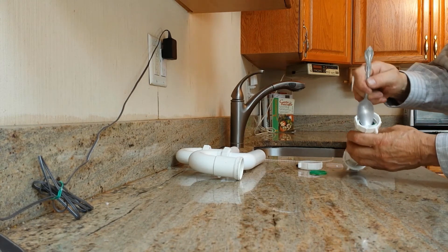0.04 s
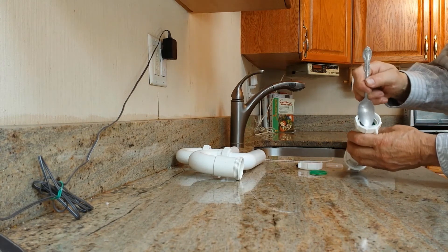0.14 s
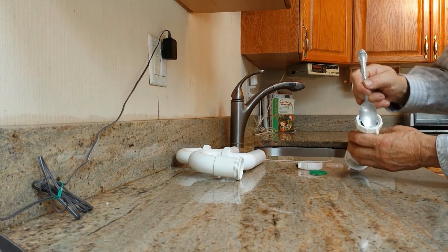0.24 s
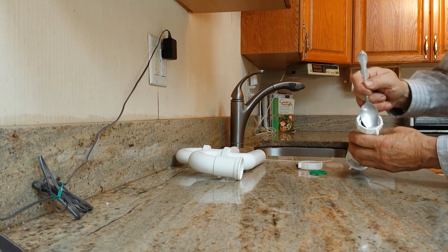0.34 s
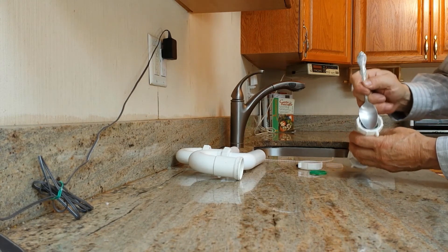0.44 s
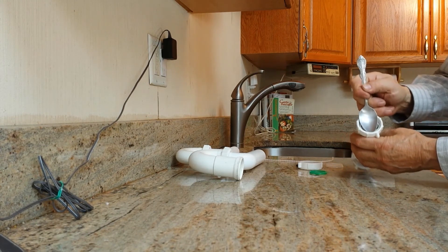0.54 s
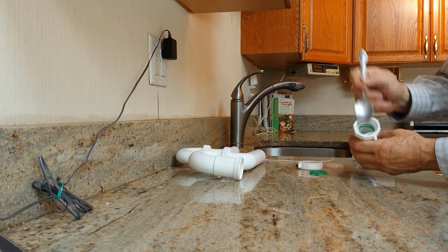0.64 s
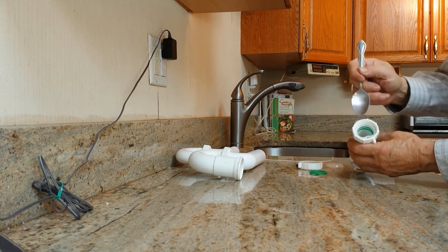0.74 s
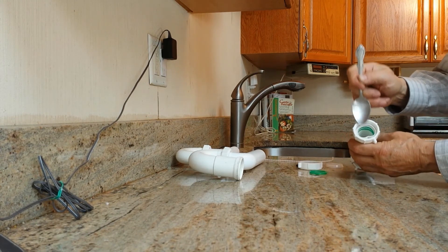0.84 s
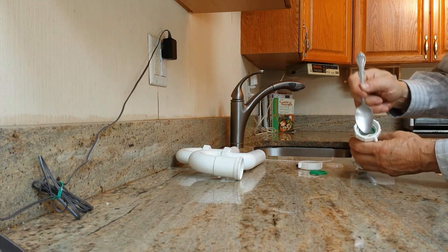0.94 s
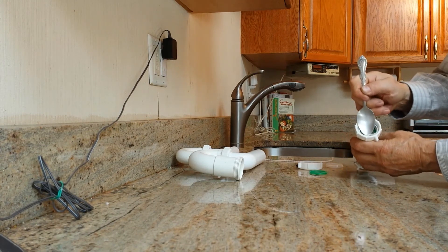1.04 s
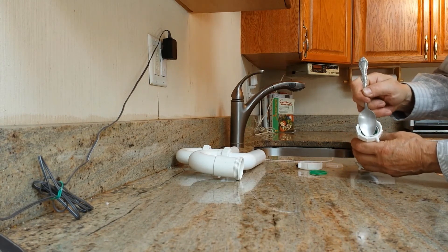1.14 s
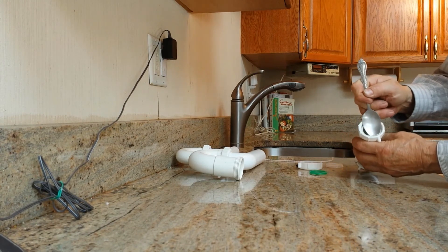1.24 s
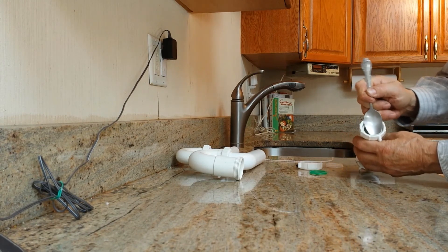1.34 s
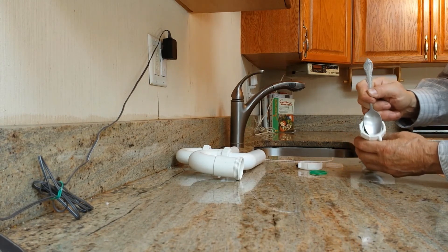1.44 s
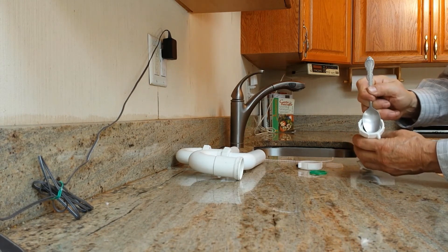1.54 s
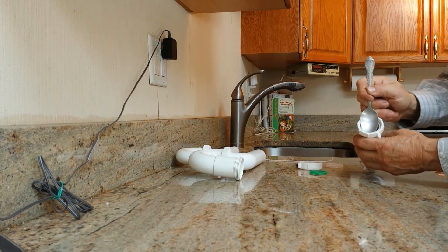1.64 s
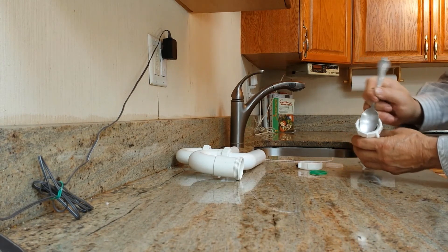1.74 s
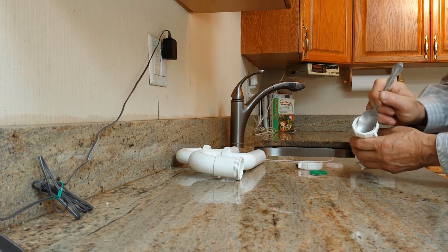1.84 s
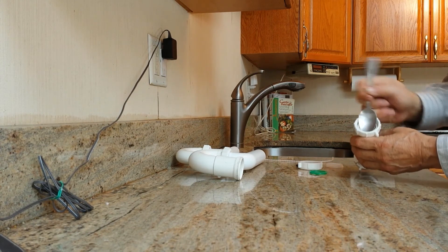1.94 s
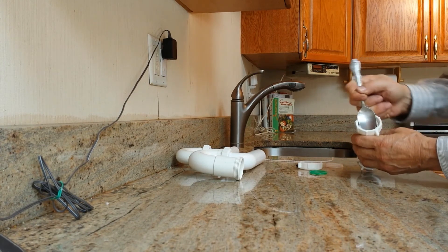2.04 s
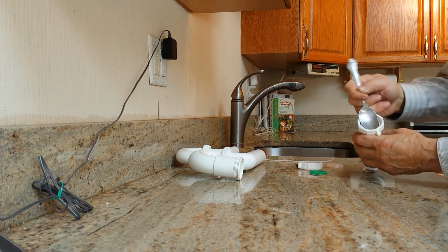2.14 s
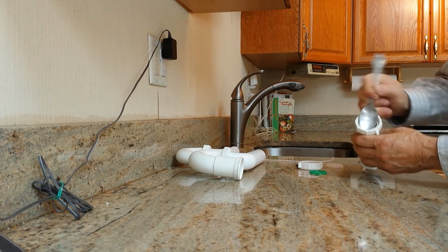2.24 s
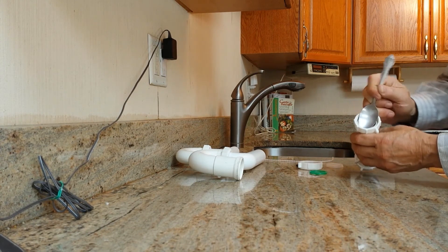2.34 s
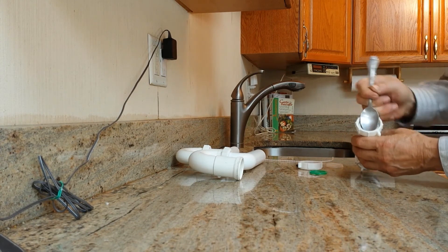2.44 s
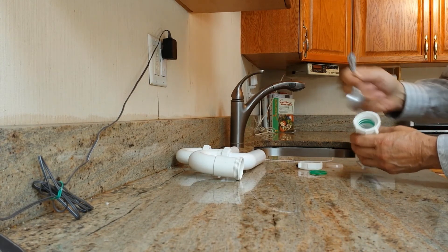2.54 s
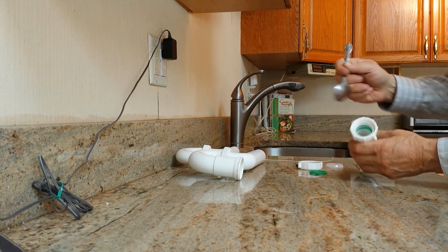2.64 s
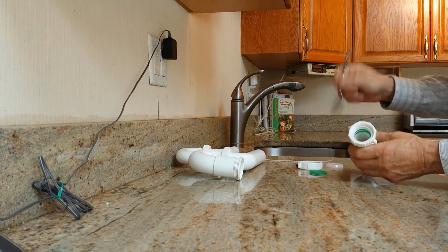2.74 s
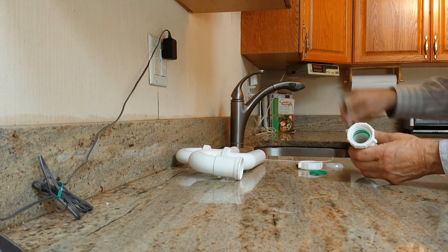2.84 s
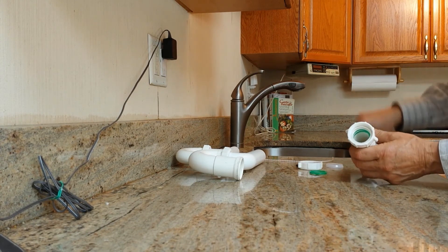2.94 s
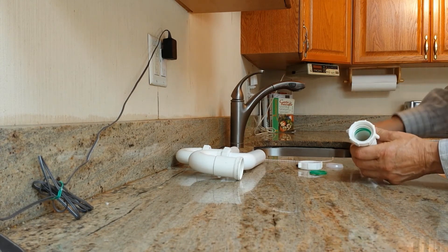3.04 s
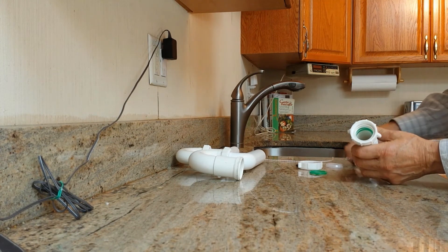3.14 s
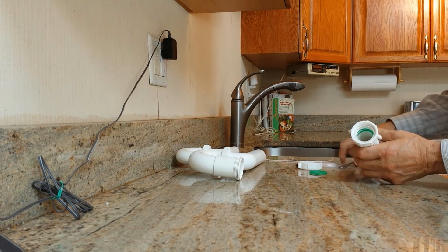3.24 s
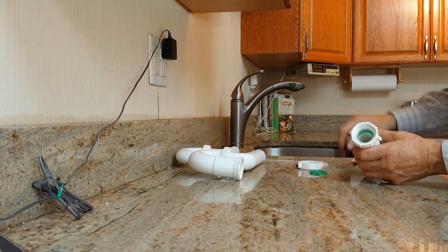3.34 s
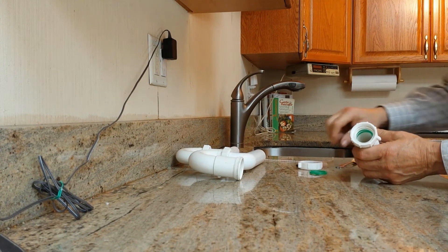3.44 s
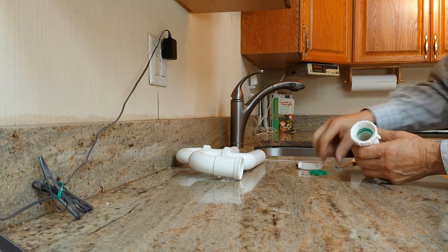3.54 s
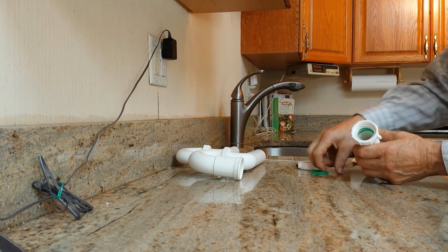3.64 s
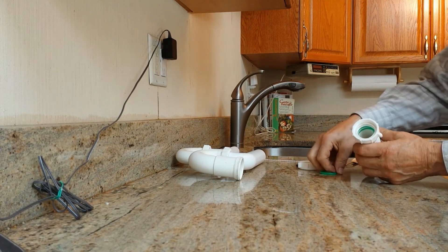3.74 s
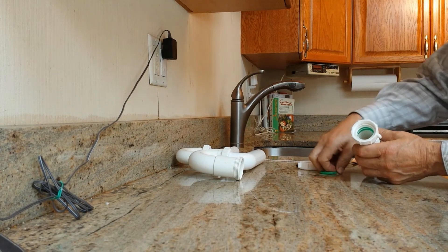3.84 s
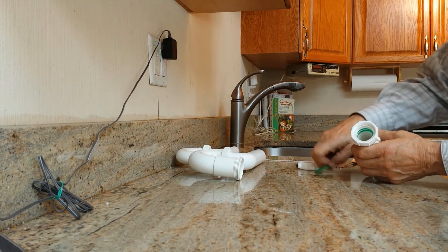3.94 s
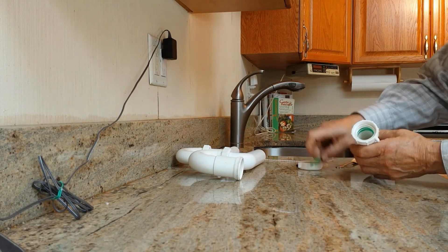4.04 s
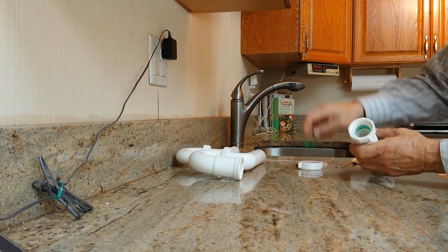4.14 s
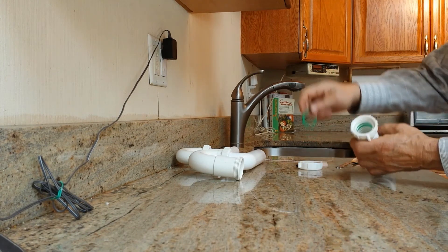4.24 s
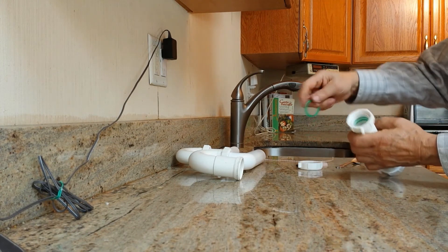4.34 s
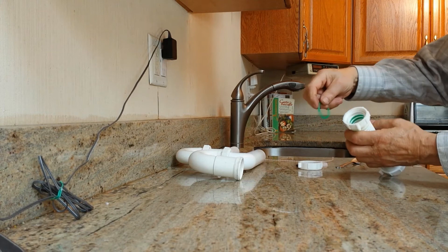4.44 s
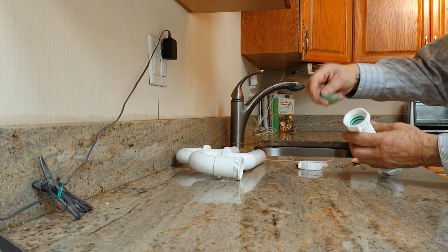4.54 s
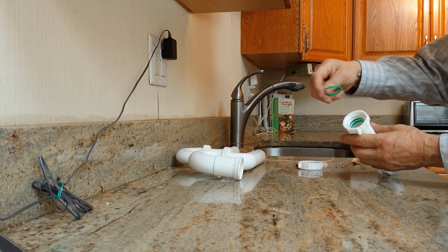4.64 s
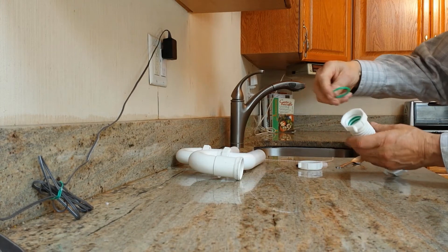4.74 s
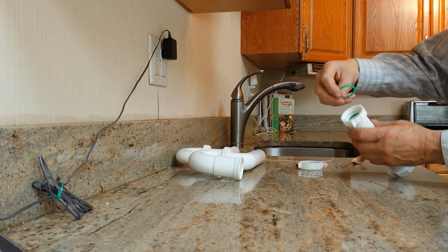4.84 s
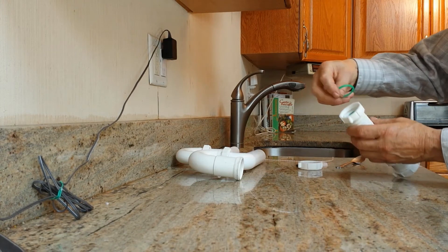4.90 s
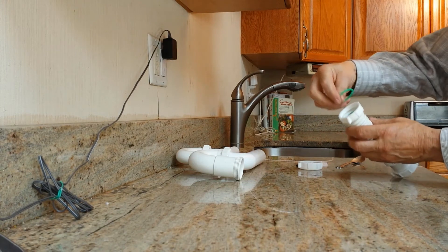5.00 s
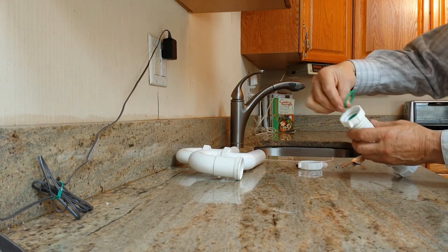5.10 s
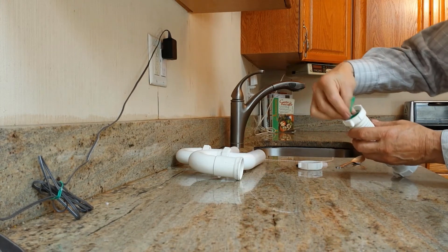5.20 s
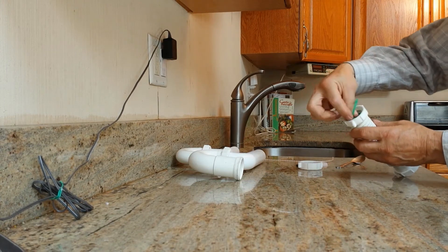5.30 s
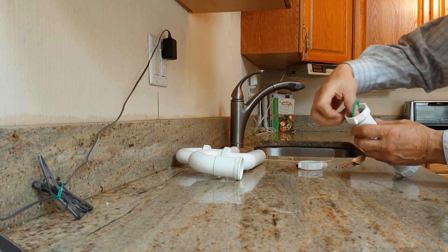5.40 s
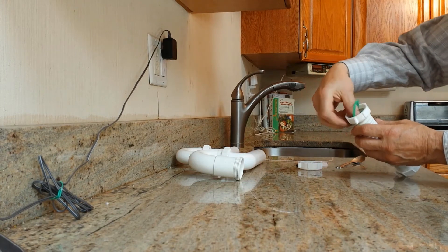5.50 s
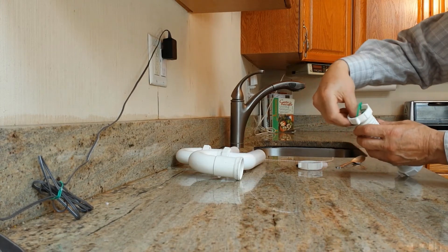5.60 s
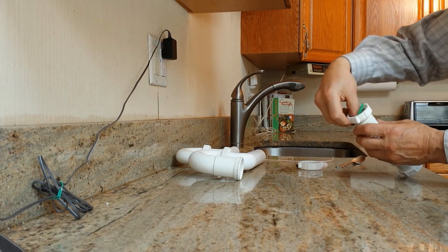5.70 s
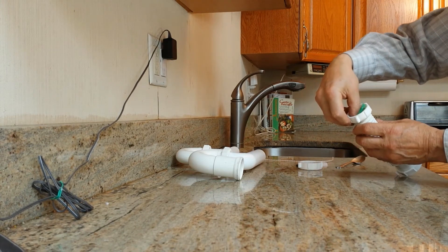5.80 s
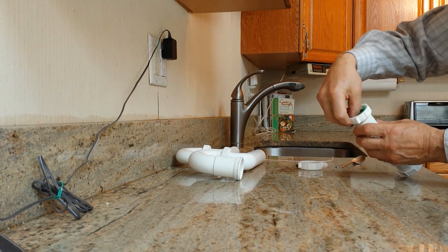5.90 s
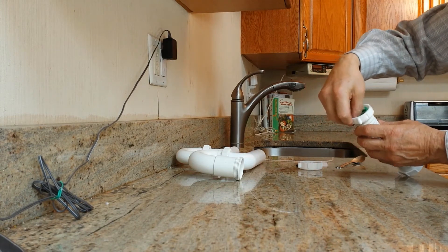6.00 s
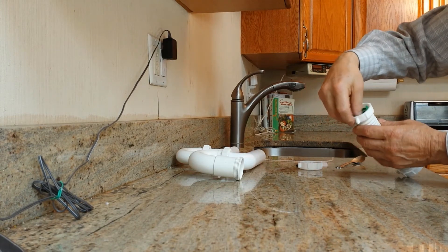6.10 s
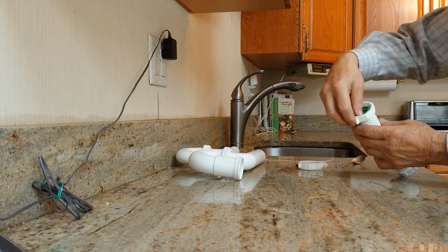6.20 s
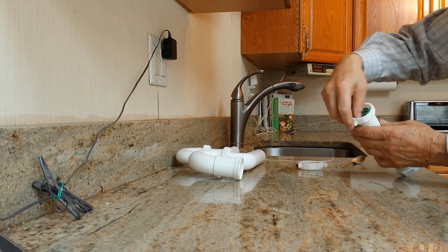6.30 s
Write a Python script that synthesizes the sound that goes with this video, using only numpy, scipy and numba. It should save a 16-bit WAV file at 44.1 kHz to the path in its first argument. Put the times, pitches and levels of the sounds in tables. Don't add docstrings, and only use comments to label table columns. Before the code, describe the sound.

Hard plastic pipe pieces snap and knock over a stone kitchen counter, then a metal spoon drops with a bright ringing clatter; faint fridge hum.

```python
import sys
import numpy as np
from scipy import signal
from scipy.fft import rfft, irfft, next_fast_len
from scipy.io import wavfile
from scipy.ndimage import uniform_filter1d
from numba import njit

SR = 44100
rng = np.random.default_rng(int(sys.argv[2]) if len(sys.argv) > 2 else 0)


def magnitude_from_level(level_db):
    exponent = np.asarray(level_db, float) / 20
    return 10 ** exponent


def digitize_waveform(pressure):
    field = np.atleast_2d(pressure).T
    bounded = np.clip(field, -1, 1)
    quanta = np.round(bounded * 32767).astype(np.int16)
    wavfile.write(sys.argv[1], SR, quanta)


N = 280476
SIZE = next_fast_len(N + SR)
FREQ = np.maximum(np.arange(SIZE // 2 + 1) * SR / SIZE, 1)
LAG = 11


def curve(points):
    hz, value = np.transpose(points)
    return np.interp(np.log(FREQ), np.log(hz), value)


def shape(x, gain):
    return irfft(rfft(x, SIZE) * gain, SIZE)[..., :N]


def add(track, s, x):
    i = int(s * SR)
    track[..., i:i + x.shape[-1]] += x[..., :N - i]


def ring(hz, width_hz):
    t = np.arange(SR // 4) / SR
    return np.sin(2 * np.pi * hz * t) * np.exp(-np.pi * width_hz * t)


def burst(hz, width_hz, t60):
    t = np.arange(SR // 20) / SR
    resonance = ring(hz, width_hz)[:300]
    body = np.convolve(resonance, resonance)
    echoes = rng.standard_normal(len(t)) * magnitude_from_level(-60 * t / t60)
    near = np.convolve(echoes, body)
    near /= np.abs(near).max()
    bare = np.pad(body, (0, len(t) - 1))
    bare = bare * np.sqrt(np.sum(near ** 2) / np.sum(bare ** 2))
    return np.array([near, bare])


# t/s, thud level/dB, crack level/dB, added counter ring f/Hz, its level/dB
KNOCKS = [
    (0.043, -52.5, -57.5, 145, -79),
    (0.744, -34, -43.5, 178, -74),
    (1.291, -45.5, -59, 355, -37),
    (1.602, -32, -37, 167, -61),
    (2.28, -43, -56.5, 172, -34.5),
    (2.388, -31.5, -42, 377, -54),
    (2.651, -25, -30, 295, -36),
    (4.292, -34, -44.5, 369, -67.5),
    (4.911, -66, -74, 388, -49),
]
THUMPS = [
    (3.09, -44.5, -69, 890, -33),
    (3.224, -35.5, -65.5, 350, -31.5),
    (3.276, -45.5, -69.5, 179.2, -45),
]
# f/Hz, width/Hz, level/dB
COUNTER = [(105, 30, -3), (185.2, 11, 7.5), (307.5, 20, 9.5), (372.5, 15, 5.5), (507.3, 21, 5.5),
           (658, 23, 7), (773, 30, 1.5), (945, 55, 6.5), (1026, 40, -17)]
BLOW_DELAY_S = 0.004
WALL_DB, WALL_FOLLOWS_CRACK = -12, 0.3


def knocks():
    out = np.zeros((2, N))
    for s, thud_db, crack_db, hz, mode_db in KNOCKS + THUMPS:
        s = s + BLOW_DELAY_S
        wall_db = thud_db + WALL_DB + WALL_FOLLOWS_CRACK * (crack_db - thud_db)
        spot_db = 0.7 * rng.standard_normal(len(COUNTER))
        boom = 0
        for k, (f, width, db) in enumerate(COUNTER):
            boom = boom - magnitude_from_level(db + spot_db[k]) * ring(f, 2.3 * width)
        soft_contact = np.hanning(24) / 12
        add(out, s, magnitude_from_level(thud_db - 9) * np.convolve(boom, soft_contact))
        add(out, s, magnitude_from_level(mode_db) * ring(hz, 45))
        add(out, s, magnitude_from_level(thud_db - 6) * burst(799, 500, 0.18))
        add(out, s, magnitude_from_level(wall_db + 10.5) * burst(2100, 1500, 0.0081))
        edge = -burst(5800, 3500, 0.014) + 0.4 * burst(10500, 8000, 0.008)
        add(out, s + 0.0008, magnitude_from_level(crack_db + 6.5) * edge)
    return out


TUBE_ROOM_DB = -1.5


def tube(hz):
    t = np.arange(SR // 4) / SR
    build_up = np.minimum(t * hz / 1.8, 1)
    to_walls = magnitude_from_level(np.array([[0], [TUBE_ROOM_DB]]))
    return ring(hz, 24 + 32 * (hz / 1000) ** 2) * build_up * to_walls


# t/s, peak level/dB, snap f/Hz, sizzle level/dB
SNAPS = [(.456, -35.5, 6200, -62), (0.5182, -15, 6030, -27), (1.042, -32.5, 5350, -48),
         (1.284, -38.5, 6270, -49), (1.46, -42.5, 6340, -69), (1.943, -40, 6340, -55),
         (2.567, -26.5, 6420, -35), (2.655, -22, 8500, -18.5), (2.941, -50.5, 6000, -73),
         (3.98, -43.5, 6110, -65), (5.243, -49.5, 5630, -66), (5.305, -57.5, 7000, -66),
         (5.411, -34, 6500, -35), (5.883, -29, 5550, -33), (5.886, -26, 6400, -31),
         (5.888, -11.5, 6530, -11)]
# t/s, peak level/dB, tap f/Hz, tube f/Hz, tube level/dB
TAPS = [(.259, -47, 2390, 1570, -49), (0.519, -38, 2720, 1575, -22), (.519, -31, 2530, 759, -37.5),
        (0.945, -45, 2670, 1630, -39), (1.967, -46, 1550, 742, -40), (2.57, -43, 1300, 2330, -33.5),
        (2.653, -35.5, 2710, 1670, -25), (5.079, -63, 2780, 2800, -57), (5.158, -52, 790, 476, -49),
        (5.887, -37.5, 1510, 751, -33), (5.889, -27.5, 2430, 4350, -34), (6.1018, -44.5, 1500, 506, -35),
        (6.144, -54, 900, 486, -43.5)]
RIM_HZ, RIM_DB = 2270, -19


def clicks():
    out = np.zeros((2, N))
    for s, db, snap_hz, sizzle_db in SNAPS:
        add(out, s, magnitude_from_level(db) * burst(snap_hz, 0.36 * snap_hz, 0.007))
        add(out, s, -magnitude_from_level(sizzle_db) * burst(11500, 6000, 0.00136))
        add(out, s, magnitude_from_level(db + RIM_DB) * tube(RIM_HZ))
    for s, db, tap_hz, tube_hz, tube_db in TAPS:
        add(out, s, magnitude_from_level(db) * burst(tap_hz, 0.24 * tap_hz, 0.0073))
        add(out, s, magnitude_from_level(tube_db) * tube(tube_hz))
    return out


@njit
def mode(x, turn, loss, damping):
    y, z = np.empty(len(x)), 0j
    for i in range(len(x)):
        z = z * turn * (1 - loss * damping[i]) + x[i]
        y[i] = z.imag
    return y


SPOON_HZ = [2795, 3295, 4361, 4406, 6244, 6415, 7826, 8602, 10062, 10518, 11603, 11982, 14328, 15291]
# t60/s, level on the fall/dB, on the roll/dB, while rocking/dB, left minus right/dB
SPOON = [(0.051, -36, -40.5, -46.5, -6.5), (0.06, -49.5, -62, -47, 4.5), (0.36, -34.5, -38.5, -40.5, 2),
         (.2, -47.5, -46, -29.5, -15), (0.69, -55.5, -33.5, -26.5, 3), (0.38, -23.5, -24, -23.5, -5.5),
         (0.3, -29, -41, -27, -5), (0.25, -58.5, -39.5, -30, -4.5), (0.19, -39, -28.5, -32, -13),
         (0.16, -39, -32, -30.5, -30), (.3, -59.5, -26, -26.5, -13), (0.41, -29, -29, -38.5, -19),
         (0.24, -41.5, -16.5, -23.5, -26), (.2, -48.5, -22.5, -30.5, -23)]
# t/s, blow level/dB, brightness/dB per octave, clatter level/dB
BLOWS = [(3.092, -15.5, 4.5, -25.5), (3.095, 0.5, -2.6, -14), (3.143, -3.5, 7.5, -17.5),
         (3.156, -2.5, -7, -23.5), (3.168, -15, 1, -30.5), (3.178, -9.5, -3.5, -32),
         (3.267, -21, -8.5, -20.5), (3.272, -28, -10, -14), (3.287, -1, -4.5, -21.5),
         (3.309, -7.5, 5, -24.5), (3.328, -8.5, 2.4, -30), (3.338, 2, 1.5, -34), (3.357, -10.5, 0, -33.5),
         (3.375, -4.5, 0.5, -27.5), (3.392, -7.5, 1.5, -22), (3.405, -8.5, 1, -31), (3.424, -8.5, 1.5, -28),
         (3.438, -2, -5, -28.5)]
# t/s, chatter level/dB, damping factor
CONTACT = [
    (3.09, -62, 1.6),
    (3.1, -27.5, 1.8),
    (3.18, -22, 4.5),
    (3.195, -34, 2.8),
    (3.26, -36.5, 3.6),
    (3.32, -20, 0.66),
    (3.44, -22.5, 0.27),
    (3.465, -39, 5),
    (3.55, -68.5, 2.4),
]
# f/Hz, width/Hz, level/dB
CLATTER = [(330, 1400, -18.5), (816, 280, -22.5), (1500, 550, -21.5), (2950, 1400, -11.5),
           (6100, 2700, 0.5), (9000, 6900, -3.5)]
ROLL_S, ROCK_S = 3.26, 3.372
CHOKE = 13.92
RATTLE_DB, RATTLE_SLOPE = -26.5, 1


def clatter_burst(t60):
    out = 0
    for k, (hz, width, db) in enumerate(CLATTER):
        out = out + (-1) ** k * magnitude_from_level(db) * burst(hz, width, t60)
    return out


def spoon():
    t = np.arange(N) / SR
    s, chatter_db, damping = np.transpose(CONTACT)
    rattle_db = RATTLE_DB + RATTLE_SLOPE * (chatter_db + 23)
    damping = np.maximum(np.interp(t, s, damping), 0.2)
    ticks = (rng.random(N) < 1600 / SR) * np.clip(rng.standard_normal(N), -1.8, 1.8)
    ticks = ticks * (t > s[0]) * (t < s[-1])
    blow_s, blow_db, bright_db, _ = np.transpose(BLOWS)
    at = (blow_s * SR).astype(int)
    for i in at:
        damping[i - 30:i + 40] += CHOKE

    spot_db = 1.5 * rng.standard_normal((len(BLOWS), len(SPOON)))
    out = np.zeros((2, N))
    for k, (t60, fall_db, roll_db, rock_db, pan_db) in enumerate(SPOON):
        hz = SPOON_HZ[k]
        drive = ticks * magnitude_from_level(np.interp(t, s, chatter_db)) + 1e-18
        drive[at] += magnitude_from_level(blow_db + bright_db * np.log2(hz / 8000) + spot_db[:, k])
        pose_db = np.where(t < ROLL_S, fall_db, np.where(t < ROCK_S, roll_db, rock_db))
        swell = np.hanning(140) * np.cos(2 * np.pi * hz * t[:140]) / 35
        drive = signal.oaconvolve(drive * magnitude_from_level(pose_db + 6.5), swell)[:N]
        y = mode(drive, np.exp(2j * np.pi * hz / SR), np.log(1000) / (t60 * SR), damping)
        out += np.array([magnitude_from_level(pan_db) * np.roll(y, LAG), y])

    tick = clatter_burst(0.0036)[1, :300]
    rattle = signal.oaconvolve(ticks * magnitude_from_level(np.interp(t, s, rattle_db)), tick)[:N]
    clatter = np.tile(rattle, (2, 1))
    for hit_s, _, _, hit_db in BLOWS:
        add(clatter, hit_s, magnitude_from_level(hit_db) * clatter_burst(0.006))
    return out, clatter


# f/Hz, likeness 0-1
ALIKE = [(60, 0.6), (130, 1), (290, 0.1), (640, 0.34), (1410, 0), (3100, 0.2), (6820, 0.2), (15000, 0)]


def diffuse(noise, ports):
    c = np.clip(curve(ALIKE), 0, 1)
    mid = noise[0] * np.sqrt((1 + c) / 2)
    side = noise[1] * np.sqrt((1 - c) / 2)
    late = np.exp(-2j * np.pi * FREQ * 0.67 * LAG / SR)
    tilt_db = curve(ports) / 2
    return np.array([(mid + side) * late * magnitude_from_level(tilt_db), (mid - side) * magnitude_from_level(-tilt_db)])


# f/Hz, t60/s
ROOM_T60 = [(125, 0.32), (500, 0.52), (1000, 0.44), (2500, 0.42), (6000, 0.4), (14000, 0.25)]
# f/Hz, left minus right level/dB
ROOM_PORTS = [(60, -5), (200, -3), (700, 5.5), (1290, 5), (2380, 1.5), (4400, 3.5), (8120, -3),
              (15000, -10)]


def room():
    t = np.arange(SR) / SR
    t60_hz, t60_s = np.transpose(ROOM_T60)
    out = 0
    for hz in 56.6 * 2. ** np.arange(9):
        t60 = np.interp(np.log(hz), np.log(t60_hz), t60_s)
        build_up = np.clip((t - 0.001) / 0.004, 0, 1)
        echoes = rng.standard_normal((2, SR)) * magnitude_from_level(-60 * t / t60) * build_up
        octave = np.cos(np.pi / 2 * np.clip(np.log2(FREQ / hz), -1, 1))
        out = out + rfft(echoes, SIZE) * octave
    out = diffuse(out, ROOM_PORTS) / np.sqrt(SR * 0.006)
    usual = uniform_filter1d(np.abs(out), size=1200)
    even = irfft(out * np.minimum(1, usual / np.abs(out)) ** 0.95, SIZE)
    return rfft(even[:, :SR] * np.clip(t / 0.001, 0, 1), SIZE)


def walk(rate):
    k = int(SR / rate)
    steps = np.repeat(rng.standard_normal(N // k + 1), k)
    return 1.3 * uniform_filter1d(uniform_filter1d(steps, k), k)[:N]


# f/Hz, level/dB per Hz
MURMUR = [(25, -27.5), (52, -4), (190, -1.5), (250, -5.5), (1000, -20.5), (4000, -28.5), (6380, -24.5),
          (16000, -32)]
# f/Hz, left minus right level/dB
PORTS = [(60, -2), (110, -0.5), (200, -2.5), (380, 2.5), (1290, 1.5), (4400, 0), (8120, -5.5), (15000, 1.5)]
# f/Hz, level/dB
HUM = [(58, -78), (207, -72.5), (275, -72.5), (410, -72.5), (1010, -84)]
MURMUR_DB = -58.5
MOTOR_HZ, MOTOR_DB, MOTOR_DB_PER_S = 138, -64, -0.52
BEAT_S, BEAT_PEAK_S, BEAT_DEPTH = 3.8, 3.4, 0.93


def fridge():
    noise = rfft(rng.standard_normal((2, SIZE)))
    murmur = irfft(diffuse(noise, PORTS) * magnitude_from_level(curve(MURMUR)), SIZE)[..., :N]
    murmur = murmur * magnitude_from_level(MURMUR_DB + 0.6 * walk(9)) / np.sqrt(np.mean(murmur ** 2))
    t = np.arange(N) / SR
    beat = np.abs(1 + BEAT_DEPTH * np.exp(2j * np.pi * (t - BEAT_PEAK_S) / BEAT_S))
    motor_db = MOTOR_DB + MOTOR_DB_PER_S * t + 20 * np.log10(beat + 1e-3)
    hum = 0
    for hz, db in [(MOTOR_HZ, motor_db)] + HUM:
        level = np.sqrt(2) * magnitude_from_level(db + 2.5 * walk(9))
        hum = hum + level * np.sin(2 * np.pi * hz * t + 2.6 * walk(13))
    return murmur + hum * magnitude_from_level(np.array([[-0.8], [0.8]]))


# f/Hz, level/dB
SHADOW = [(200, -7.5), (700, -11.5), (2400, -0.5), (5000, -15), (8000, -26), (15000, -18)]
# f/Hz, level/dB
MIC = [(40, -21.5), (80, -7.5), (130, -5.5), (300, 0.05), (3500, 4), (6400, 1), (9000, 2), (15000, -0.6)]
KNOCK_ROOM_DB, CLICK_ROOM_DB, RATTLE_ROOM_DB, SPOON_ROOM_DB = -4.5, -7, -7.5, -11.5
STONE_ECHO_S, STONE_ECHO_DB = 0.0021, -10
SCATTER = 0.99
LIFT_S, LOWER_S = 5.6, 6.05
LIFT_ROOM_DB = 8


def scene():
    metal, clatter = spoon()
    knock, click = knocks(), clicks()
    near = knock[0] + click[0] + clatter[0]
    near = near + magnitude_from_level(STONE_ECHO_DB) * np.roll(near, int(STONE_ECHO_S * SR))
    blur = np.interp(FREQ / 500, np.arange(50), rng.standard_normal(50))
    blur = SCATTER * blur * np.minimum(FREQ / 1000, 1)
    far = magnitude_from_level(curve(SHADOW)) * np.exp(1j * (blur - 2 * np.pi * FREQ * LAG / SR))
    direct = np.array([shape(near, far), near])

    t = np.arange(N) / SR
    lifted = (t > LIFT_S) & (t < LOWER_S)
    send = magnitude_from_level(KNOCK_ROOM_DB) * knock[1]
    send = send + magnitude_from_level(CLICK_ROOM_DB + LIFT_ROOM_DB * lifted) * click[1]
    send = send + magnitude_from_level(RATTLE_ROOM_DB) * clatter[1] + magnitude_from_level(SPOON_ROOM_DB) * metal[1]
    wet = shape(send, room())
    return shape(direct + wet, magnitude_from_level(curve(MIC))) + metal + fridge()


def roll_off(x):
    return signal.sosfilt(signal.butter(12, 16810, fs=SR, output="sos"), x)


# f/Hz, level/dB
TOP = [(15600, 0), (15900, -30), (16800, -45)]


def record(dry):
    mix = shape(dry, magnitude_from_level(curve(TOP)))
    return roll_off(mix)


dry = scene()
out = record(dry)
digitize_waveform(out)
```